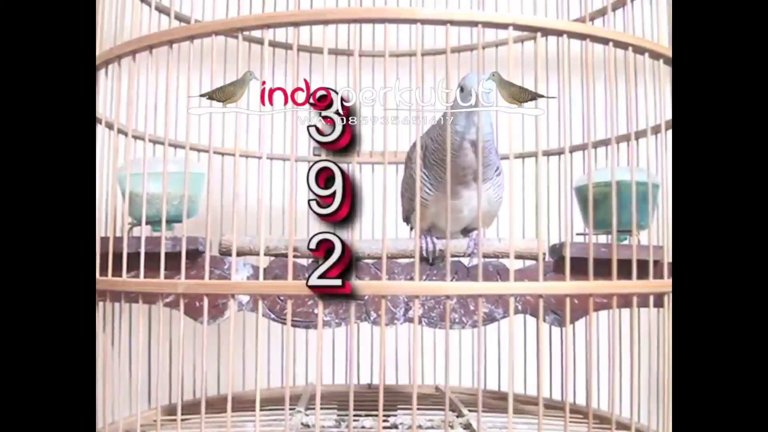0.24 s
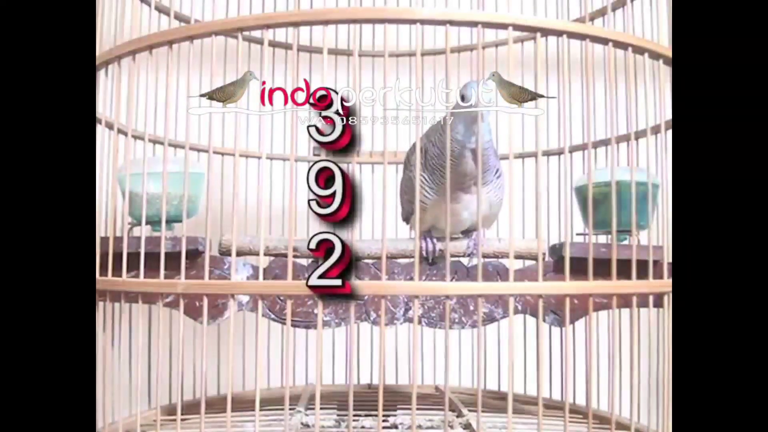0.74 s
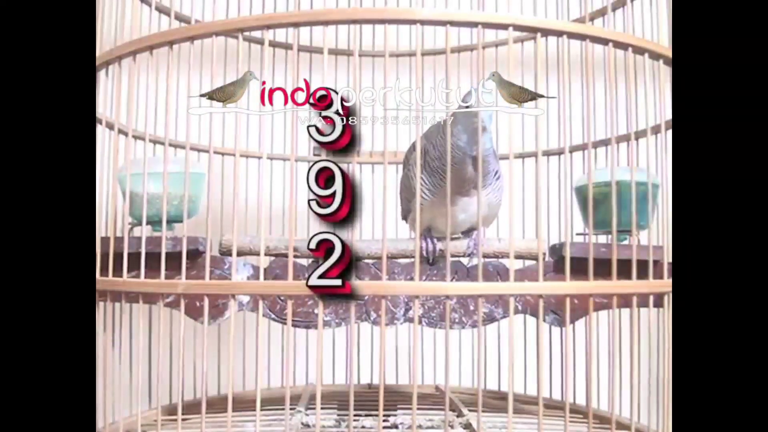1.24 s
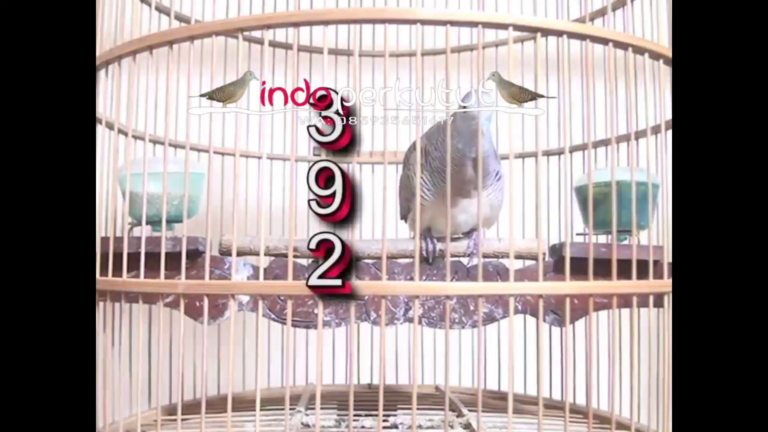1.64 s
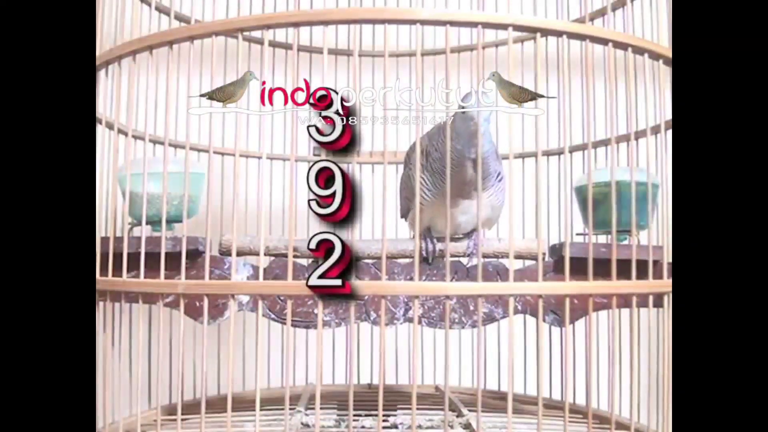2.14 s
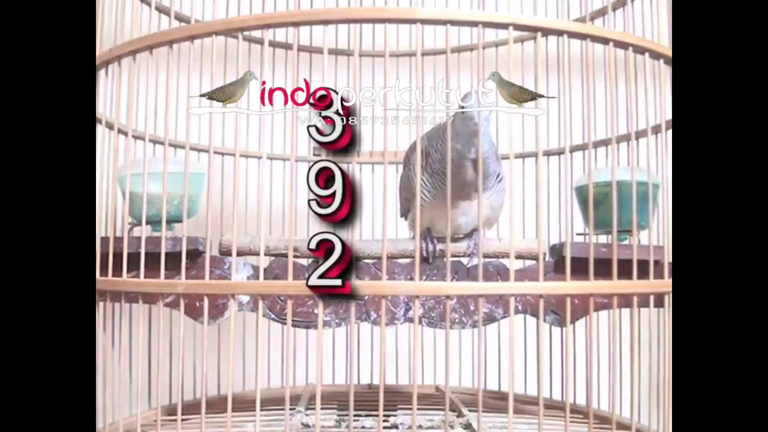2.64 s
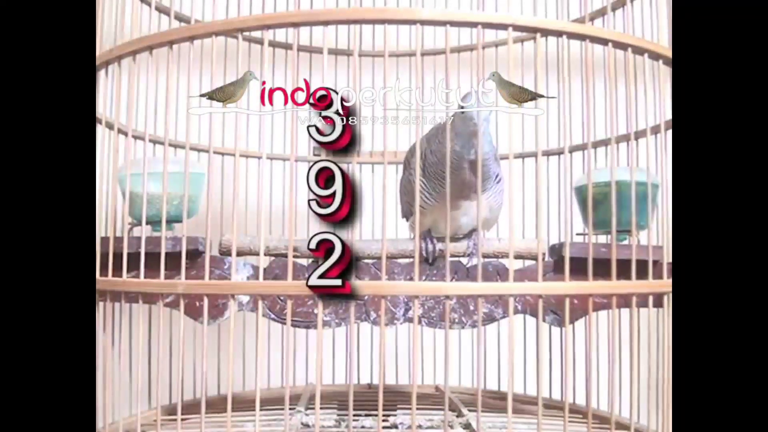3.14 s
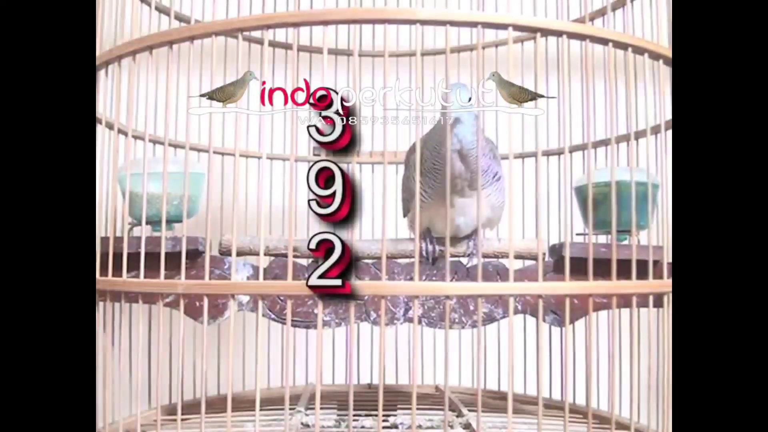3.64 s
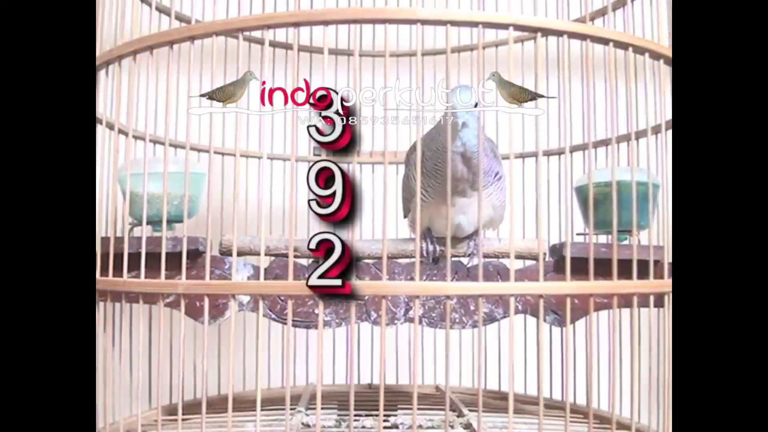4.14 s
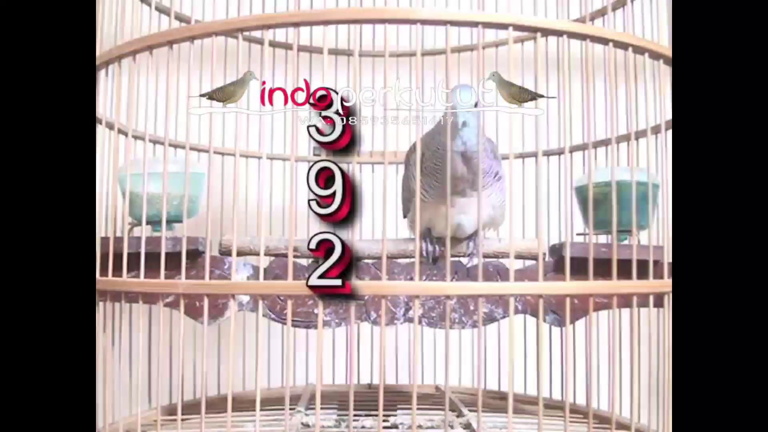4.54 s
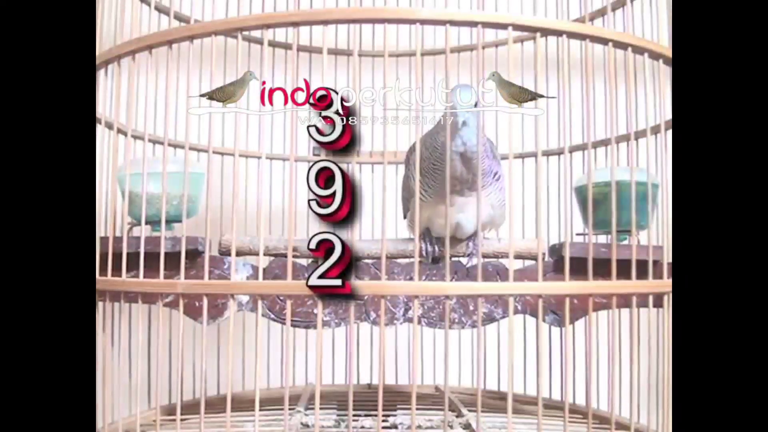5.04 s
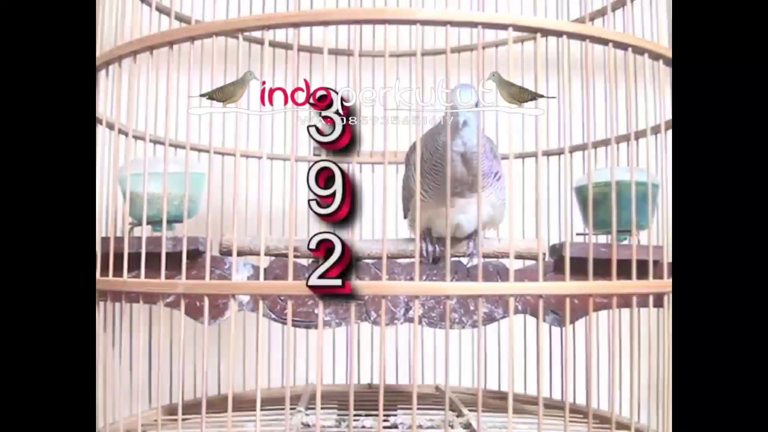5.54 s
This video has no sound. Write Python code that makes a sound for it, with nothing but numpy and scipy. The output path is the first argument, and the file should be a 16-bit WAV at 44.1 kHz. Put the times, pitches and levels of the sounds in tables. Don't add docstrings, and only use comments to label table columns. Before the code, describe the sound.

A close dove in a bare, slightly ringing room gives a click and one longer coo, then about ten quick, evenly spaced notes that flip from rough low to clear higher pitch. Four slower, rounder coos follow, with throat pops. A fainter dove answers at the start and again at the end. Low rumble, soft hiss and barely audible outdoor birds lie beneath; loud notes sound slightly squashed.

```python
import sys
import numpy as np
from scipy import signal
from scipy.fft import rfft, irfft, next_fast_len
from scipy.io import wavfile
from scipy.ndimage import uniform_filter1d, map_coordinates

SR = 44100
rng = np.random.default_rng(int(sys.argv[2]) if len(sys.argv) > 2 else 0)


def generate_wav(sig):
    pcm = np.round(np.clip(np.atleast_2d(sig).T, -1, 1) * 32767).astype(np.int16)
    wavfile.write(sys.argv[1], SR, pcm)


def boost(x):
    u = np.asarray(x, float) / 20
    return 10 ** u


N = 254898

# (pitch_hz, level_db)
THROAT = [(300, -37), (500, 0.5), (660, 2.5), (790, 9), (950, 7), (1200, -5.5), (1380, -9), (1600, -27.5),
          (2000, -32.5), (2450, -22), (3200, -26.5), (3900, -36), (4800, -33.5), (7500, -45)]
# (start_s, length_s, pitch_hz, level_db, swell_db)
HEAD = [(.669, 0.027, 1198, -8.5, -2.5), (0.9, .035, 1192, -8, -2.5), (1.134, 0.035, 1195, -8.5, -2),
        (1.379, .033, 1192, -10, 2), (1.63, .051, 1202, -10, -.5), (1.888, .041, 1189, -8.5, 2)]
# (time_s, pitch_hz, level_db)
OPENING = [
    (0.195, 1199, -14.5),
    (0.204, 1209, -6.5),
    (0.227, 1208, -14),
    (0.276, 1199, -9),
    (0.34, 1226, -16),
    (0.374, 1203, -13),
    (.402, 1211, -14),
    (0.422, 1264, -12.5),
    (0.431, 1038, -10),
]
# (time_s, pitch_hz, level_db)
LAST_HEAD = [
    (3.286, 1058, -12.5),
    (3.306, 1156, -18.5),
    (3.354, 1128, -27),
    (3.364, 1097, -14),
    (3.398, 1052, -16.5),
]


def near_dove():
    # (pitch_hz, ring_s to fall by 60 dB)
    walls = [(300, 0.38), (800, 0.45), (1200, 0.54), (3000, 0.55), (8000, 0.21)]
    chest, both = chest_voice(), both_voice()
    bird = chest + both + two_membranes(chest, both)
    bird = bird + head_voice() + under_voice() + closing_voice() + held_voice() + throat_clicks()

    lag_s, echo_s, echo_db = 5.5e-5, .116, -18

    def path(f):
        echo = 1 + boost(echo_db) * np.exp(-2j * np.pi * f * echo_s) / (1 + (f / 2500) ** 2)
        return echo * np.exp(1j * np.pi * f * lag_s * np.array([[1], [-1]]))

    direct = filtered(bird, path) * boost([[-.3], [.3]])
    shared, left, right = diffuse_ring(lambda f: along(walls, f), delay_s=.004, channels=3)
    ring = np.array([shared + 0.66 * left, shared + 0.51 * right])
    return direct + boost(-9.5) * signal.fftconvolve(bird[None], ring, axes=1)[:, :N]


def chest_voice():
    return voice(chest_notes(), lead_s=0.01115, scoop=.72, lead_db=-13, tail_s=.003, fall=0.96,
                 overtone_db=-2.5, most_db=5, jitter=0.004, flutter_db=0.4, breath_db=-22, count=10)


def chest_notes():
    # (start_s, quiet_climb_s, loud_s until the break, peak_db, linger_s after the break)
    chest = [(.637, 0.016, .011, -5, .004), (.874, 0.015, .006, -8, 0.0043),
             (1.104, .016, .011, -5.5, .004), (1.34, .018, .013, -4.5, .004),
             (1.595, 0.014, .011, -3.5, .004), (1.854, 0.01503, .014, -5.5, 0.0039),
             (2.097, 0.021, .015, -4, .03), (2.347, 0.021, .026, -5.5, 0.057), (2.613, .023, .019, -5, .06),
             (2.884, .029, .039, -5.5, 0.052), (3.188, 0.032, .062, -5, .004)]
    # (time_s, pitch_hz, level_db)
    climb = [
        (.136, 678, -20.5),
        (.162, 687.5, -17.5),
        (.189, 754, -9.5),
        (.195, 833, -16),
    ]
    start_hz, catch_hz, highest_hz = 691, 769, 821.8
    quiet_db, swell_s, settle_s = -14, .013, .026
    notes = [climb]
    for s, quiet, loud, db, linger in chest:
        catch = s + quiet
        stop = catch + loud
        settle = min(loud, settle_s)
        top_hz = catch_hz + (highest_hz - catch_hz) * np.sqrt(settle / settle_s + .3).clip(0, 1)
        notes.append([(s, start_hz, quiet_db),
                      (max(catch - swell_s, s + .001), (start_hz + catch_hz) / 2, quiet_db),
                      (catch, catch_hz, db - .7),
                      (catch + .9 * settle, top_hz, db),
                      (stop, top_hz, db + 0.4),
                      (stop + min(.005, linger / 2), top_hz, db - 5.5),
                      (stop + linger, 1.01 * top_hz, db - 10)])
    return notes


def head_voice():
    # (share of length, pitch ratio, level_db)
    arch = [(0, .93, -1), (.3, .98, -.7), (.6, 1, .5), (.85, .985, 0), (1, .945, -.7)]
    return voice([OPENING, *shaped(HEAD, arch), LAST_HEAD], lead_s=0.0095, scoop=0.72, lead_db=-3,
                 tail_s=0.009, fall=0.65, overtone_db=-6.0, most_db=-20.5, jitter=0.002,
                 flutter_db=2.2, breath_db=-24, count=7)


def both_voice():
    # (start_s, length_s, pitch_hz, level_db, swell_db)
    both = [(2.137, .03, 1114, -8.5, -0.5), (2.399, .052, 1103, -9.5, -1), (2.659, .054, 1093, -9.5, -2),
            (2.953, .054, 1089, -11.5, 4.5)]
    # (share of length, pitch ratio, level_db)
    arch = [(0, .975, 0), (.15, 1, 0), (.75, 1, 0), (1, .97, -1)]
    return voice(shaped(both, arch), lead_s=0.0031, scoop=0.79, lead_db=-3, tail_s=0.012, fall=0.92,
                 overtone_db=-9, most_db=-25, jitter=0.0025, flutter_db=1.52, breath_db=-28, count=4)


def two_membranes(chest, both):
    def valve(x):
        return np.exp(3.32 * x)

    mixed = valve(chest + both) - valve(chest) - valve(both) + 1
    return boost(-16.5) * filtered(mixed, lambda f: boost(0.8 * along(THROAT, f)) * (f > 1250))


def under_voice():
    # (share of length, pitch ratio, level_db)
    arch = [(0, 1.03, -5.5), (.55, .995, 0), (1, 1.005, -8.5)]
    pitch_hz, below_db, longest_s = 818, -15, .06
    heads = [(OPENING[-1][0] - longest_s, longest_s, OPENING[-1][2])]
    heads += [(s + 0.012, length, db) for s, length, _, db, _ in HEAD]
    heads += [(LAST_HEAD[0][0] + 0.0013, longest_s, LAST_HEAD[0][2] + 4)]
    notes = shaped([(s, length, pitch_hz, db + below_db, 0) for s, length, db in heads], arch)
    return voice(notes, lead_s=.005, scoop=0.94, lead_db=-9.0, tail_s=0.0017, fall=1.0,
                 overtone_db=-7.5, most_db=-25, jitter=0.01, flutter_db=6.5, breath_db=-25, count=3)


def closing_voice():
    # (start_s, length_s, pitch_hz, level_db, swell_db)
    closing = [
        (3.597, .046, 706, -17, 2.5),
        (3.908, .034, 713.4, -16.5, 1.5),
        (4.38, .075, 707.3, -17, -1),
        (4.8, .11, 659.5, -20, -2.5),
    ]
    # (share of length, pitch ratio, level_db)
    rise = [(0, .94, 0.5), (.3, 0.99, -0.8), (.6, .995, 0), (1.002, 0.95, 1)]
    # (time_s, peak_db)
    pops = [(3.584, -22.5), (3.895, -22.5), (4.364, -9.5), (4.78, -7.5)]
    tone = voice(shaped(closing, rise), lead_s=0.016, scoop=.66, lead_db=-13.5, tail_s=.003, fall=.97,
                 overtone_db=-3.5, most_db=5, jitter=.006, flutter_db=1.17, breath_db=-17, count=9)
    return tone + clicks(pops, [770, 860], rise_s=0.0037, ring_s=.06, boost_db=0)


def held_voice():
    # (start_s, length_s, pitch_hz, level_db, swell_db)
    held = [
        (3.648, 0.072, 779.2, -6.5, -1.5),
        (3.948, 0.2, 784, -6, -1.5),
        (4.465, .066, 782.6, -5.5, 0.2),
        (4.918, .146, 775.6, -11.5, -7.5),
    ]
    # (share of length, pitch ratio, level_db)
    sag = [(0, 1.006, 0), (.6, 1.003, -0.13), (.93, .985, -0.5), (1, .975, -3)]
    return voice(shaped(held, sag), lead_s=0.0053, scoop=0.93, lead_db=-11.5, tail_s=0.0072, fall=0.95,
                 overtone_db=-7.5, most_db=-31.5, jitter=.0015, flutter_db=0.53, breath_db=-31, count=4)


def throat_clicks():
    # (time_s, peak_db)
    events = [(0.112, -11), (0.606, -12.5), (0.844, -14), (1.079, 1), (1.819, -6), (2.314, -23),
              (2.582, -30), (2.856, -16), (3.156, -13.5), (3.56, -8.5), (3.869, -20), (4.337, -8.5),
              (4.751, -5.5)]
    return clicks(events, [520, 800, 1100], rise_s=0.0015, ring_s=0.0053, boost_db=-3.5)


def far_dove():
    # (start_s, length_s, pitch_hz, level_db, swell_db)
    answer = [(.044, .13, 1203, -20, 2), (.557, .085, 1202, -20, -4), (.817, .085, 1177, -19.5, 1),
              (1.068, .075, 1190, -20, 1.5), (1.358, .035, 1174, -18, 2), (1.452, .024, 1175, -18, -7),
              (1.557, .026, 1171, -20.5, -2.5), (4.83, .078, 1175, -22, -2),
              (5.008, 0.022, 1165, -24.5, -5), (5.088, 0.018, 1196, -23, -5.5),
              (5.197, .05, 1214, -21, 1.5), (5.345, .088, 1224, -20.5, -1), (5.537, 0.11, 1202, -19, 4),
              (5.763, 0.061, 1204, -22.5, -3)]
    # (share of length, pitch ratio, level_db)
    arch = [(0, .95, -1.5), (0.161, 1.005, -2), (.6, 1, -0.5), (0.898, .985, -1.5), (1, .96, -10.5)]
    # (time_s, peak_db)
    ticks = [(0.0268, -30), (0.2775, -40), (0.5383, -31), (0.8, -31), (1.054, -26.5), (2.7696, -54),
             (2.822, -39), (4.1405, -37.5), (4.6593, -48), (4.7339, -34.5), (4.7484, -31.5),
             (4.7605, -29.5), (4.7729, -25), (4.781, -24), (4.993, -28.5), (5.0681, -29.5), (5.184, -29.5),
             (5.3246, -31), (5.5262, -30), (5.7464, -32.5)]
    bird = voice(shaped(answer, arch), lead_s=.014, scoop=.79, lead_db=-15, tail_s=.011, fall=0.88,
                 overtone_db=-24.5, most_db=-28, jitter=0.0013, flutter_db=0.86, breath_db=-37.5, count=3)
    bird += clicks(ticks, [1033, 1260, 1387, 1490, 1650, 1786], rise_s=0.0045, ring_s=0.03, boost_db=1)
    ring = diffuse_ring(lambda f: .13 + 0 * f, delay_s=.006, channels=1)[0]
    return bird + boost(-15) * signal.fftconvolve(bird, ring)[:N]


def voice(notes, lead_s, scoop, lead_db, tail_s, fall, overtone_db, most_db, jitter, flutter_db,
          breath_db, count):
    # (pitch_hz, level_db per Hz)
    breath = [(300, -34.5), (700, -4.5), (1200, 2.5), (1700, -15.5), (2500, -9.5), (4500, -19),
              (7000, -15.5), (10000, -22), (15000, -32.5)]
    hz, gain = phrase(notes, lead_s, scoop, lead_db, tail_s, fall)
    on = gain > 1 / 2000
    phase = (2 * np.pi * np.cumsum(hz * (1 + jitter * wobble(90))) / SR)[on]
    unsteady = wobble(120)[on]
    lift_db = along(THROAT, hz)
    firm = np.clip(gain[on] / 0.55, .15, 1.5) ** -.4
    tone = np.sin(phase)
    for k in range(2, count + 1):
        colour_db = np.minimum(overtone_db + along(THROAT, k * hz[on]) - lift_db[on], most_db)
        level = firm * boost(colour_db + 1.8 * np.roll(unsteady, 977 * k))
        tone += level * np.sin(k * phase + 16 * jitter * k * unsteady)
    air = unit(filtered(rng.standard_normal(N), lambda f: boost(along(breath, f))))
    out = boost(breath_db - .7 * np.maximum(lift_db, 0) + 2 * wobble(120)) * air
    out[on] += np.sqrt(2) * tone * boost(flutter_db * wobble(60)[on])
    return gain * out


def clicks(events, modes_hz, rise_s, ring_s, boost_db):
    out, t = np.zeros(N + SR), np.arange(SR // 25) / SR
    shape = (1 - np.exp(-(t / rise_s) ** 2)) * boost(-60 * t / ring_s)
    spread = rng.standard_normal((len(events), 2, len(modes_hz)))
    for (s, db), (detune, uneven) in zip(events, spread):
        hz = np.multiply(modes_hz, 1 + .05 * detune)
        size = boost(db + boost_db + 2 * uneven)
        ringing = size @ np.sin(2 * np.pi * np.outer(hz, t) + 3 * uneven[:, None])
        out[round((s - 1.5 * rise_s) * SR):][:len(t)] += shape * ringing
    return out[:N]


def diffuse_ring(decay_s, delay_s, channels):
    hz, t, z = signal.stft(rng.standard_normal((channels, SR)), SR, nperseg=256)
    ring = signal.istft(z * boost(-60 * t / decay_s(hz)[:, None]), SR, nperseg=256)[1]
    return np.pad(ring / np.linalg.norm(ring[0]), ((0, 0), (round(delay_s * SR), 0)))


def birds_outside():
    # (start_s, length_s, pitch_hz, level_db, swell_db)
    whistles = [
        (.005, .135, 3000, -45, -4.5),
        (5.32, 0.17, 3300, -46.5, -6),
    ]
    # (start_s, length_s, pitch_hz, level_db, swell_db)
    pigeon = [(.3, 0.31, 485, -48.5, 1), (.975, 0.27, 395, -46, -3.5), (1.4, 0.33, 345, -49.5, -2.5),
              (3.45, .075, 295.7, -46.5, 2.5), (3.64, 0.071, 280.3, -47.5, 1),
              (5.05, 0.43, 463.6, -54, -7.5)]
    # (share of length, pitch ratio, level_db)
    arch = [(0, 1.005, -2.5), (.4, 1, 1), (1, .995, -3.5)]
    songbird = distant(shaped(whistles, arch), level_db=-5, waver=0.014, flutter_db=4.0)
    return songbird + distant(shaped(pigeon, arch), level_db=-0.5, waver=0.035, flutter_db=5.0)


def distant(notes, level_db, waver, flutter_db):
    hz, gain = phrase(notes, lead_s=0.029, scoop=0.95, lead_db=-13.5, tail_s=0.066, fall=0.96)
    tone = np.sin(2 * np.pi * np.cumsum(hz * (1 + waver * wobble(220))) / SR)
    return gain * boost(level_db + flutter_db * np.array([wobble(90), wobble(130)])) * tone


def room_tone():
    # (pitch_hz, level_db per Hz)
    hiss = [(15, -0.5), (32, 1), (60, -3.5), (130, -11.5), (300, -14.5), (500, -19.5), (1000, -17.5),
            (1600, -24), (2500, -24.5), (4000, -29), (6000, -31.5), (10000, -31.5), (15500, -33.5)]
    # (pitch_hz, left-right likeness from 0 to 1)
    alike = [(40, .8), (90, .74), (180, .63), (350, .7), (1000, .6), (4000, .35), (8000, .5), (13000, .8)]

    def spread(f):
        angle = np.arccos(np.clip(along(alike, f), -1, 1)) / 2
        return boost(along(hiss, f)) * [np.cos(angle), np.sin(angle)]

    mid, side = filtered(rng.standard_normal((2, N)), spread)
    hum = boost(-55.0 + 3.0 * wobble(7.2)) * np.sin(2 * np.pi * 50 * np.arange(N) / SR)
    return boost(-43.5 + 1.1 * wobble(7.6)) * unit(np.array([mid + side, mid - side])) + hum


def shaped(rows, shape):
    return [[(s + u * length, ratio * hz, db + bend_db + swell_db * (u - .5))
             for u, ratio, bend_db in shape]
            for s, length, hz, db, swell_db in rows]


def phrase(notes, lead_s, scoop, lead_db, tail_s, fall):
    rows = []
    for note in notes:
        (s0, hz0, db0), (s1, hz1, db1) = note[0], note[-1]
        rows += [(s0 - lead_s - .006, scoop * hz0, -110), (s0 - lead_s, scoop * hz0, db0 + lead_db)]
        rows += [(s0 - lead_s / 2, (.3 * scoop + .7) * hz0, db0 + .35 * lead_db), *note]
        rows += [(s1 + tail_s, fall * hz1, db1 - 6.5), (s1 + tail_s + 0.014, fall * hz1, -110)]
    s, hz, db = np.transpose(rows)
    t = np.arange(N) / SR

    def smooth(v):
        return uniform_filter1d(v, size=SR // 260)

    return smooth(np.interp(t, s, hz)), smooth(boost(np.interp(t, s, db)))


def wobble(rate):
    return map_coordinates(rng.standard_normal(int(N * rate / SR) + 4), [np.arange(N) * rate / SR])


def along(points, hz):
    f, v = np.transpose(points)
    return np.interp(np.log(hz + 1), np.log(f + 1), v)


def filtered(x, response):
    m = next_fast_len(N + SR // 2)
    return irfft(rfft(x, m) * response(np.fft.rfftfreq(m, 1 / SR)), m)[..., :N]


def unit(x):
    return x / np.sqrt(np.mean(x ** 2) + 1e-20)


def scene():
    return near_dove() + far_dove() + birds_outside() + room_tone()


def roll_off(x):
    return signal.sosfilt(signal.butter(12, 15620, fs=SR, output="sos"), x)


def record(dry):
    offset, hardness = .0018, 14
    mid, side = (dry[0] + dry[1]) / 2, (dry[0] - dry[1]) / 2
    side = filtered(side, lambda f: boost(along([(6300, 0.5), (7200, -9), (12000, -8)], f)))
    x = np.array([mid + side, mid - side]) + offset
    mix = x / (1 + np.abs(x) ** hardness) ** (1 / hardness)
    return roll_off(mix)


dry = scene()
out = record(dry)
generate_wav(out)
```